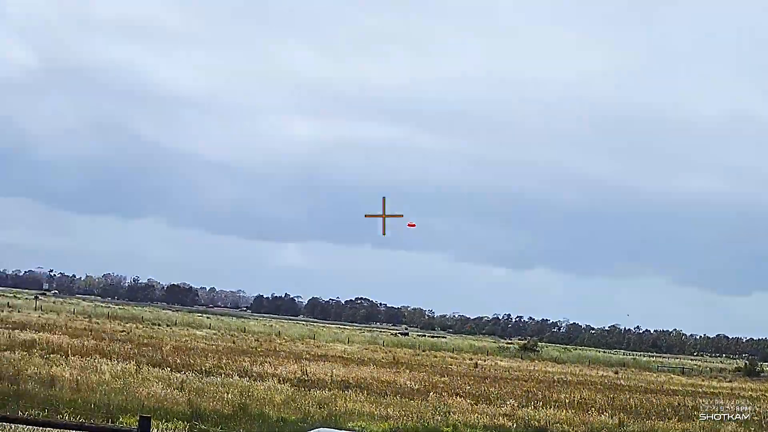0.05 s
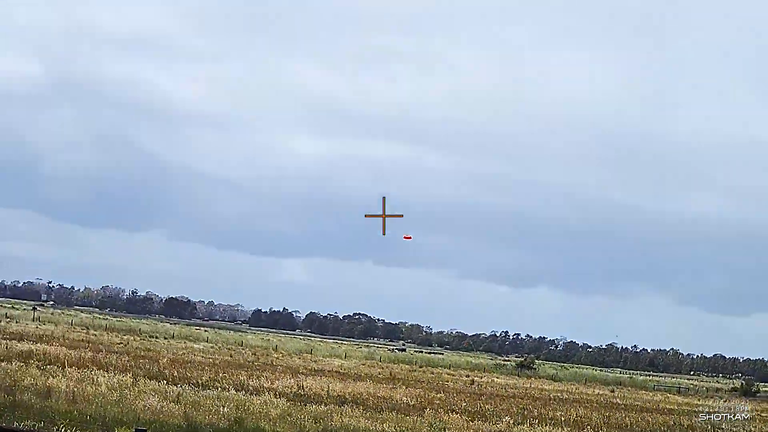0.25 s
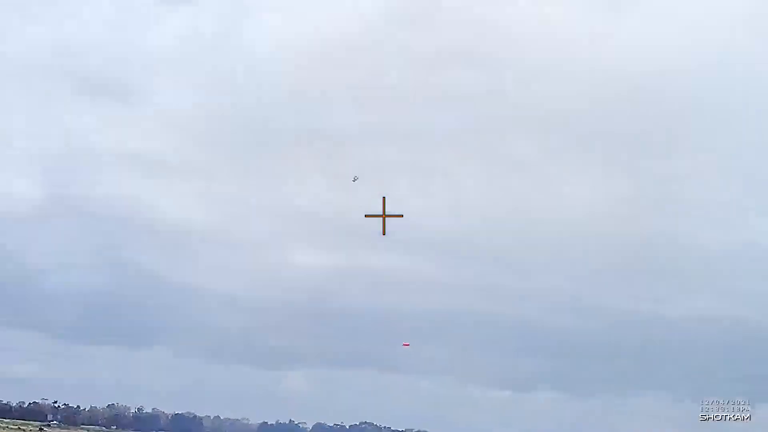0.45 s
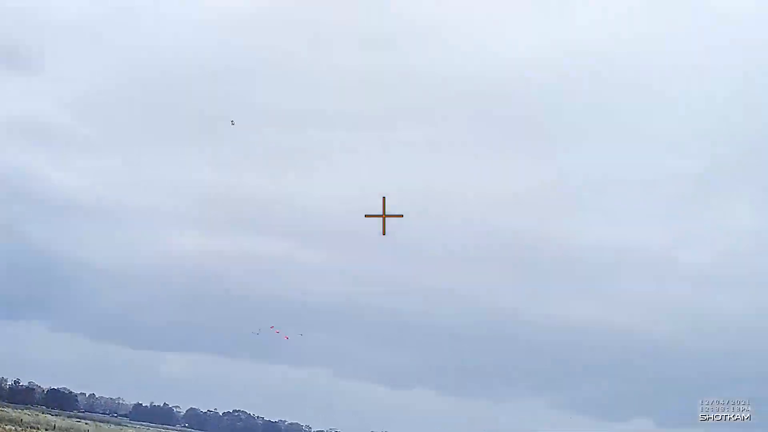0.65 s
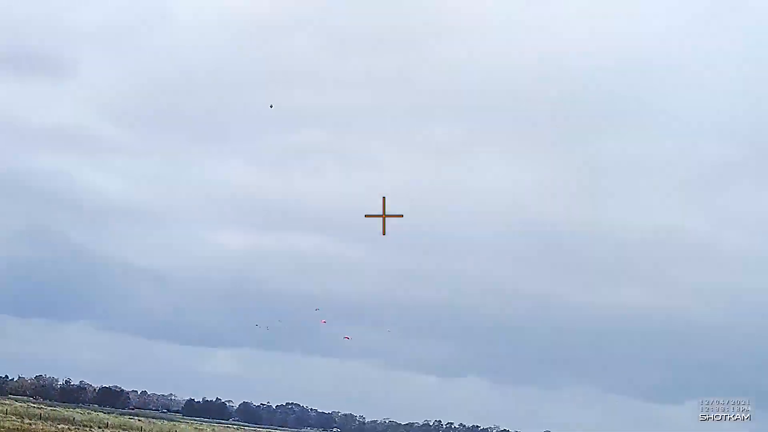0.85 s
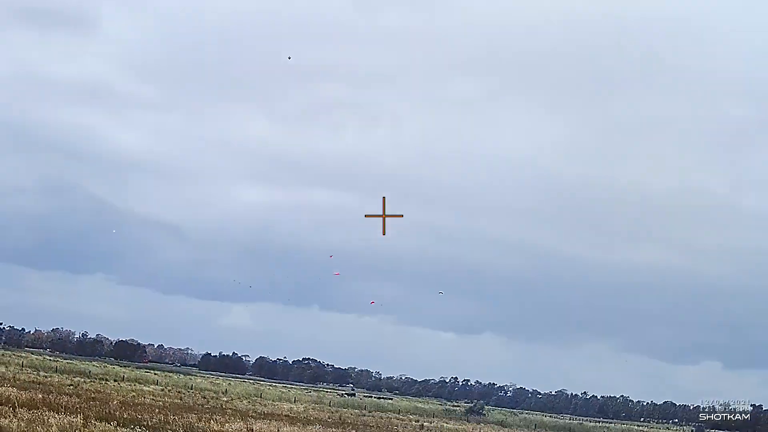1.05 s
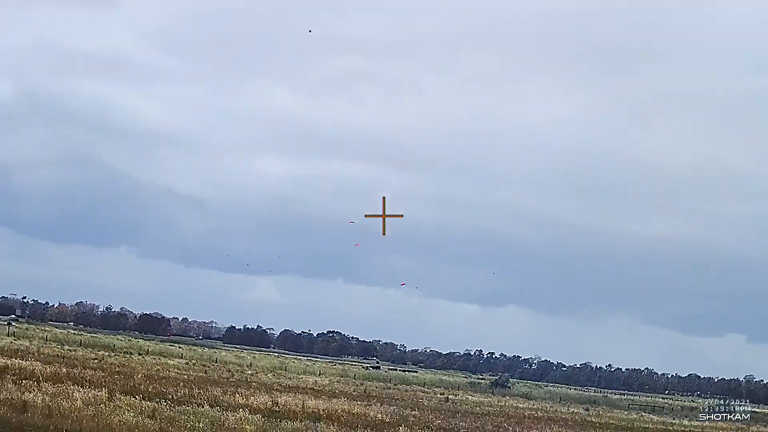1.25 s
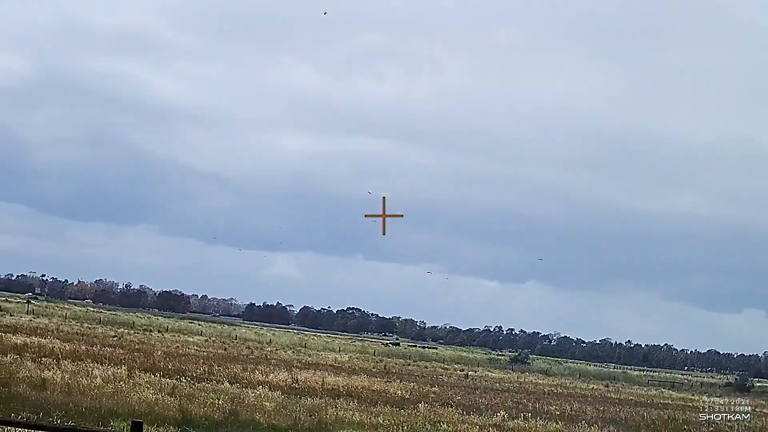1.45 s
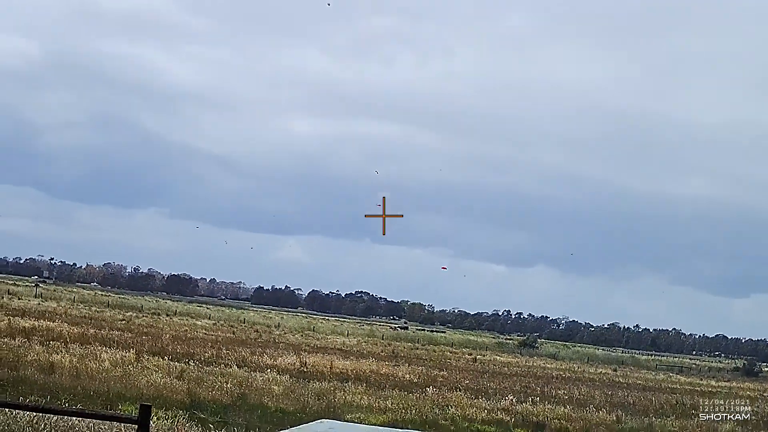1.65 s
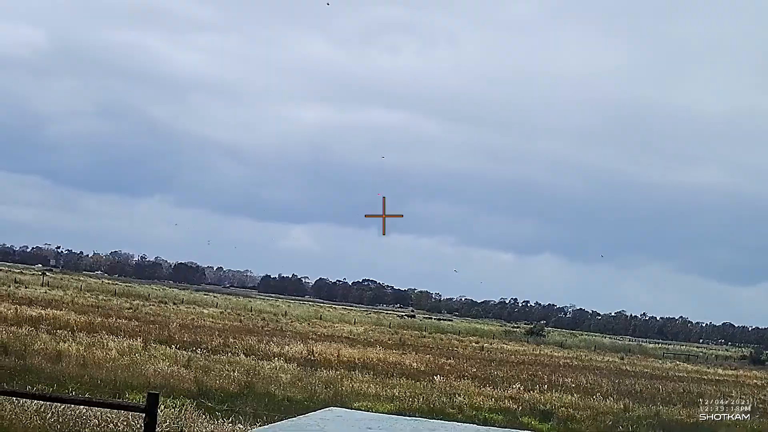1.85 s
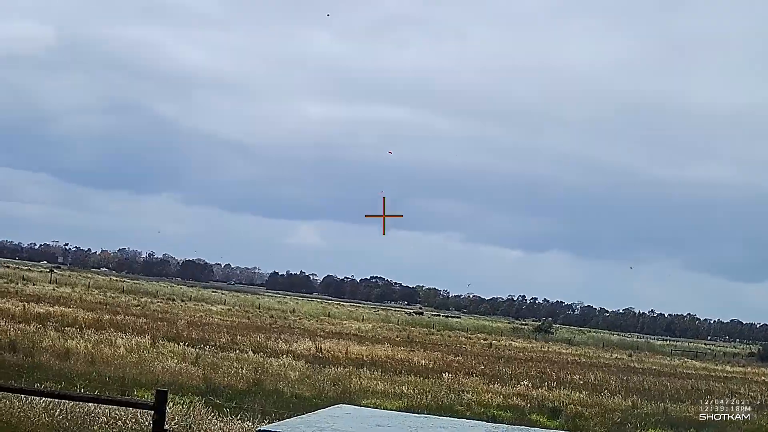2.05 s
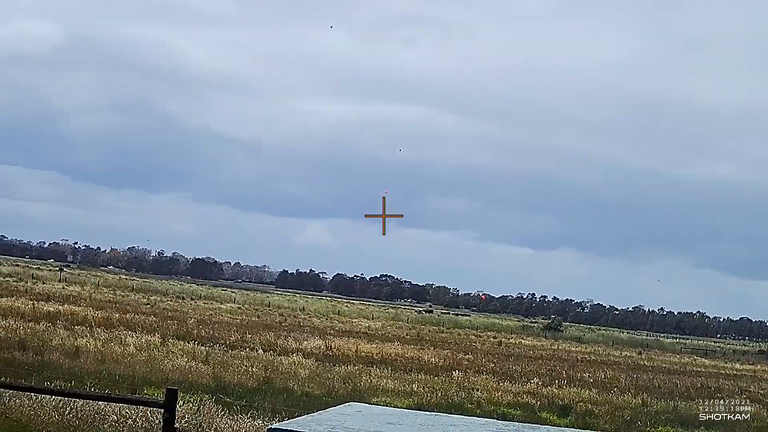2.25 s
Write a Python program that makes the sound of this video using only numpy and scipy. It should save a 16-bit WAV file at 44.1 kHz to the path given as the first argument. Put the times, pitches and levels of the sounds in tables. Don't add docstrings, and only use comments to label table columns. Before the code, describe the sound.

A single shotgun shot after a brief faint hiss, clipping a small microphone clamped under the barrel; recoil thumps and action knocks follow, the report decays over an open field, leaving faint metallic ringing and low wind.

```python
import sys
import numpy as np
from scipy import signal
from scipy.io import wavfile
from scipy.ndimage import uniform_filter1d

SR = 44100
rng = np.random.default_rng(int(sys.argv[2]) if len(sys.argv) > 2 else 0)


def file_out(sig):
    cols = np.atleast_2d(sig).T
    lim = np.clip(cols, -1, 1)
    pcm = np.round(lim * 32767).astype(np.int16)
    wavfile.write(sys.argv[1], SR, pcm)


def level_to_linear(level):
    exponent = np.asarray(level, float) / 20
    return 10 ** exponent


N = 101429

# (time [s], length [s], strength [full scale])
JOLTS = [(.2141, .0011, 8.6), (.2156, .0012, 8.5), (.2173, .0007, 9), (.2217, .0016, 8.5),
         (.2236, 0.00073, 7.5), (.2267, .0023, 9), (.2327, .0003, 4.1), (.2333, .0003, 3.45),
         (.2375, .0019, 5.2), (.2394, .0006, 3.8), (.2400, .0006, 4.3), (.2406, .006, 5.1)]
# (time [s], length [s], strength [full scale])
LURCHES = [
    (.245, .0143, 2.5),
    (.2593, .0125, -1.5),
    (.2722, .0155, 0.7),
    (.2895, .015, -0.58),
    (.3195, .0145, -0.3),
]
# (time [s], pressure [full scale])
SWING = [
    (.25, 0),
    (.33, -.22),
    (.42, -0.13),
    (.49, -0.058),
    (.53, 0.044),
    (.59, 0.1),
    (.66, -0.032),
    (.77, 0.074),
    (.9, -0.028),
]
# (frequency [Hz], level [dB])
REPORT_SPECTRUM = [(60, 0), (200, -4), (600, -10.5), (1000, -16.5), (1800, -22), (4000, -31), (8000, -50)]
# (frequency [Hz], T60 [s])
REPORT_DECAY = [(60, .4), (250, 0.63), (700, 0.67), (2000, .45), (7000, .4)]
# (frequency [Hz], level [dB], T60 [s])
BARREL_MODES = [(393.23, -57.5, 5.6), (460, -57, 4.6), (517, -46, .7), (575, -50, .8), (631, -58, 3.7),
                (694.9, -37, 2.34), (813, -58, 1.3), (1010.5, -48, .5), (1109, -48, .55), (1244, -50, .5),
                (1373, -58, 1.1), (1760, -36, 0.81), (2223, -42, .7), (3066, -61, .5)]
# (frequency [Hz], level [dB], T60 [s])
STOCK_MODES = [(205, -1, 0.11), (300, -6, .05), (450.2, 0.5, .025), (550, -3, 0.044), (683, -4, .035),
               (856.1, -8.5, .05), (1080, -10, .045), (1213, -8.5, 0.052), (1549.5, -16, .06),
               (1840, -13, 0.035), (1954, -17, .08), (2430, -20, 0.042), (3152, -18, .04),
               (4000, -18.5, 0.022)]
# (time [s], peak level [dB], contact low-pass [Hz], favoured pitch [Hz])
KNOCKS = [(.2625, -2, 3000, 700), (.272, -7.5, 3010, 700), (.288, -12, 3000, 1900), (.353, -25, 2500, 1913),
          (.368, -16, 4940, 550), (.381, -13, 220, 205), (.41, -25.5, 252, 205), (.43, -21, 1200, 590),
          (.455, -24.5, 300, 205), (.52, -44, 3000, 2400), (.653, -25, 2460, 530), (.711, -22, 2090, 455),
          (0.7134, -28, 3020, 1900), (.737, -34, 1500, 499), (.739, -35, 2494, 1897),
          (.803, -32.5, 2500, 860.6), (.958, -44.5, 1700, 1480), (1.115, -50, 300, 205),
          (1.205, -54, 600, 454.7), (1.242, -45, 1100, 1200), (1.285, -48.5, 1495, 205),
          (1.391, -46.5, 1098, 862), (1.542, -54, 900, 690)]
# (frequency [Hz], level [dB])
AIR_SPECTRUM = [(35, -32), (60, -2), (145, -8), (455, -10.5), (559, -11), (791, -16), (8000, -23),
                (10400, -53), (17600, -120)]

SUCK_FROM_S, SUCK_TO_S, SUCK_DEPTH, JOLT_EDGE_HZ, LURCH_EDGE_HZ = .2134, .2465, 4, 2500, 350
HAMMER_S, HAMMER_HZ, HAMMER_DB, HAMMER_GROW_S = .2045, 800, -19, .003
IGNITE_S, IGNITE_HZ, IGNITE_DB, IGNITE_GROW_S = .2117, 2250, -24, .0008
REPORT_DB, GRAIN_DB, GRAIN_HZ = -19, 2.5, 120
FAR_DB, FAR_T60_S, FAR_HZ = -44.5, 2.6, 900
WHIP_S, WHIP_HZ, WHIP_DB, WHIP_T60_S = .2452, 32.6, 4, 0.2015
GRIP_DB, GRIP_STOP_S = -3, .2
FAVOUR_DB, FAVOUR_OCTAVES = 9, 0.38
PRESS_S, BOUNCE_S, BOUNCE_DB = .0012, .0031, -7
RATTLE_DB, RATTLE_T60_S, CRACK_DB, CRACK_T60_S = -15, 0.09, -25, 0.079
CHATTER_DB, CHATTER_HZ, CHATTER_SAG_S = -42, (1200, 5196), .9
CHATTER_END_S, CHATTER_T60_S = 0.438, 0.14
HUM_HZ, HUM_T60_S, HUM_DB, HUM_FADE_S, HUM_PATCH_DB = 203.6, .15, -55, 4, 4
WIND_DB, SWAY_HZ, RUMBLE_DB, RUMBLE_HZ = -40, 15, -64, 38
SHAKE_DB, SHAKE_T60_S, AIR_DB = 26, 3, -70.5
TOP, BOTTOM, OUTER_TOP, DROOP_HZ = .74, .72, .76, .8
RECOVER_S, RECOVER_HZ, RECOVER_DB, RECOVER_T60_S = .2755, 38.2, -4.5, .12
CUTOFF_HZ, DULL_HZ, DITHER_DB = 8065, 14036, -94


def rms_one(x):
    return x / np.sqrt(np.mean(x ** 2) + 1e-20)


def since(s):
    return np.maximum(np.arange(N) / SR - s, 0)


def fade(t, t60):
    return (t > 0) * level_to_linear(-60 * t / t60)


def at_hz(points, hz):
    table = np.array(points)
    return np.interp(np.log(hz), np.log(table[:, 0]), table[:, 1])


def ring(clicks, hz, t60):
    r, w = level_to_linear(-60 / (t60 * SR)), 2 * np.pi * hz / SR
    return signal.lfilter([0, np.sin(w)], [1, -2 * r * np.cos(w), r * r], clicks + 1e-18)


def lowpass(x, hz, order=2):
    return signal.sosfilt(signal.butter(order, min(hz, .45 * SR), fs=SR, output="sos"), x)


def bandpass(x, edges_hz, order):
    return signal.sosfilt(signal.butter(order, edges_hz, "band", fs=SR, output="sos"), x)


def bands(spectrum, low_hz, count):
    white = rng.standard_normal((2, N + SR))
    edges = low_hz * 2 ** (np.arange(count + 1) / 2)
    hz = np.sqrt(edges[1:] * edges[:-1])
    out = []
    for k in range(count):
        band = bandpass(white[k % 2], edges[k:k + 2], order=2)[SR:]
        out.append(level_to_linear(at_hz(spectrum, hz[k])) * band)
    out = np.array(out)
    return hz, out / np.sqrt(np.mean(out.sum(0) ** 2))


def steps(rows):
    t, total = np.arange(N) / SR, np.zeros(N)
    for s, length, strength in rows:
        inside = np.minimum(t - s, s + length - t)
        total += strength * np.clip(inside * SR + .5, 0, 1)
    return total


def shock():
    before = np.arange(N) / SR < SUCK_FROM_S
    hammer = rms_one(lowpass(rng.standard_normal(N), HAMMER_HZ, order=3))
    hammer = hammer * np.minimum(since(HAMMER_S) / HAMMER_GROW_S, 1)
    growth = np.exp(np.minimum(since(IGNITE_S) / IGNITE_GROW_S, 5.0))
    ignition = np.sin(2 * np.pi * IGNITE_HZ * since(IGNITE_S)) * growth
    suction = (SUCK_FROM_S, SUCK_TO_S - SUCK_FROM_S, -SUCK_DEPTH)
    blast = lowpass(steps(JOLTS + [suction]), JOLT_EDGE_HZ)
    lurch = lowpass(steps(LURCHES), LURCH_EDGE_HZ)
    return blast + lurch + before * (level_to_linear(HAMMER_DB) * hammer + level_to_linear(IGNITE_DB) * ignition)


def report():
    hz, noise = bands(REPORT_SPECTRUM, 60, count=14)
    t = since(SUCK_FROM_S)
    near = sum(band * fade(t, at_hz(REPORT_DECAY, f)) for f, band in zip(hz, noise))
    slaps = rms_one(lowpass(rng.standard_normal(N), GRAIN_HZ))
    near = near * level_to_linear(GRAIN_DB * slaps)
    far = rms_one(lowpass(noise[5:].sum(0)[::-1], FAR_HZ)) * fade(t, FAR_T60_S)
    return level_to_linear(REPORT_DB) * near + level_to_linear(FAR_DB) * far


def barrel():
    t, click = since(WHIP_S), np.zeros(N)
    click[int(SUCK_FROM_S * SR)] = 1
    reach = level_to_linear(WHIP_DB) * fade(t, WHIP_T60_S)
    reach = reach + level_to_linear(GRIP_DB) * np.maximum(1 - t / GRIP_STOP_S, 0)
    whip = reach * np.sin(2 * np.pi * WHIP_HZ * t)
    swing = np.interp(np.arange(N) / SR, *np.transpose(SWING), right=0)
    swing = uniform_filter1d(swing, size=1500)
    modes = sum(level_to_linear(db) * ring(click, hz, t60) for hz, db, t60 in BARREL_MODES)
    return whip + swing + modes


def knocks():
    out, size = np.zeros(N), SR // 4
    t = np.arange(size) / SR
    chance_db = rng.normal(0, 2, (30, len(STOCK_MODES)))
    signs = (-1) ** np.arange(len(STOCK_MODES))
    grit = rng.standard_normal((30, size)) * (rng.random((30, size)) < 900 / SR)
    moments = [0, int(PRESS_S * SR), int((PRESS_S + BOUNCE_S) * SR)]
    for (s, db, contact_hz, pitch_hz), luck, grains in zip(KNOCKS, chance_db, grit):
        hit = level_to_linear(RATTLE_DB) * grains * fade(t, RATTLE_T60_S)
        hit[moments] += [.3, 1, level_to_linear(BOUNCE_DB)]
        hit = lowpass(hit, contact_hz)
        body = np.zeros(size)
        for (hz, mode_db, t60), deviation, sign in zip(STOCK_MODES, luck, signs):
            octaves = np.log2(hz / pitch_hz)
            favour = FAVOUR_DB * np.exp(-(octaves / FAVOUR_OCTAVES) ** 2)
            body += sign * level_to_linear(mode_db + deviation + favour) * ring(hit, hz, t60)
        crack = rms_one(lowpass(rng.standard_normal(size), 1.2 * contact_hz, order=4))
        crack = crack * fade(t - PRESS_S, CRACK_T60_S)
        start = int(s * SR)
        out[start:start + size] += level_to_linear(db) * (body / np.abs(body).max() + level_to_linear(CRACK_DB) * crack)
    return out


def chatter():
    buzz = rms_one(bandpass(rng.standard_normal(N), CHATTER_HZ, order=3))
    flutter = level_to_linear(3.3 * rms_one(lowpass(rng.standard_normal(N), 90.0)))
    shape = fade(since(WHIP_S), CHATTER_SAG_S) * level_to_linear(-60 * since(CHATTER_END_S) / CHATTER_T60_S)
    return level_to_linear(CHATTER_DB) * shape * flutter * buzz


def murmur():
    patches = rms_one(lowpass(rng.standard_normal(N), 6.0))
    tone = rms_one(ring(rng.standard_normal(N), HUM_HZ, HUM_T60_S))
    return level_to_linear(HUM_DB + HUM_PATCH_DB * patches) * fade(since(SUCK_FROM_S), HUM_FADE_S) * tone


def wind():
    sway, rumble = rng.standard_normal((2, N + SR))
    sway = rms_one(lowpass(sway, SWAY_HZ, order=3)[SR:])
    rumble = rms_one(lowpass(rumble, RUMBLE_HZ, order=3)[SR:])
    shaken = 1 + level_to_linear(SHAKE_DB) * fade(since(SUCK_FROM_S), SHAKE_T60_S)
    air = bands(AIR_SPECTRUM, 60, count=15)[1].sum(0)
    return level_to_linear(WIND_DB) * sway + shaken * level_to_linear(RUMBLE_DB) * rumble + level_to_linear(AIR_DB) * air


def scene():
    return (shock() + report() + barrel() + knocks() + chatter() + murmur() + wind())[None]


def low_pass(x):
    return signal.sosfilt(signal.butter(12, 8810, fs=SR, output="sos"), x)


def record(dry):
    t = since(RECOVER_S)
    recovery = level_to_linear(RECOVER_DB) * fade(t, RECOVER_T60_S) * np.sin(2 * np.pi * RECOVER_HZ * t)
    x = np.clip(dry, -BOTTOM, TOP) - recovery
    x = signal.sosfilt(signal.butter(1, DROOP_HZ, "high", fs=SR, output="sos"), x)
    x = np.clip(x, -OUTER_TOP, OUTER_TOP)
    x = lowpass(x, DULL_HZ, order=1)
    x = signal.sosfiltfilt(signal.butter(12, CUTOFF_HZ, fs=SR, output="sos"), x)
    mix = x + level_to_linear(DITHER_DB) * rng.standard_normal(dry.shape)
    return low_pass(mix)


dry = scene()
out = record(dry)
file_out(out)
```